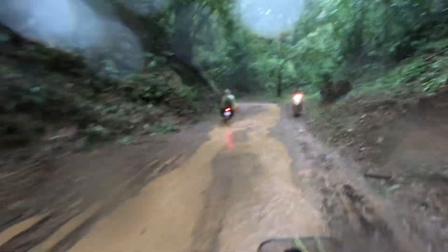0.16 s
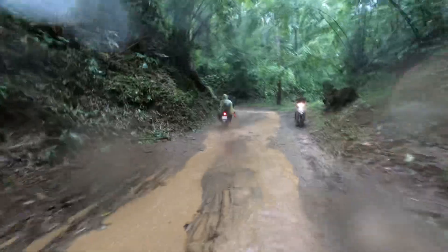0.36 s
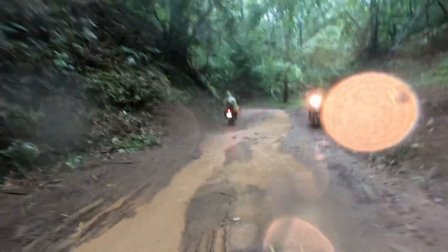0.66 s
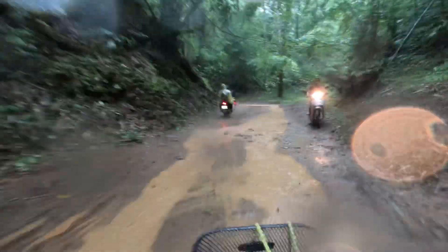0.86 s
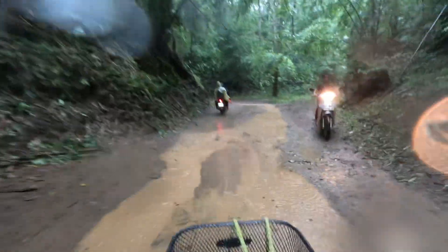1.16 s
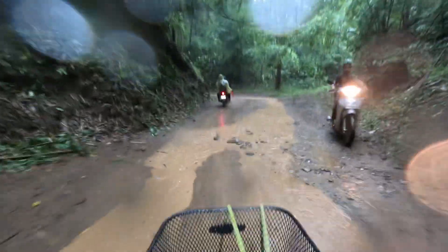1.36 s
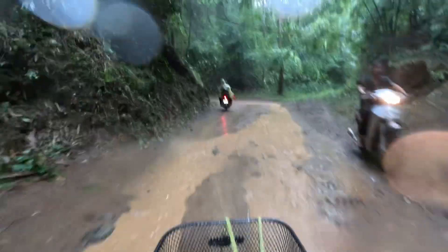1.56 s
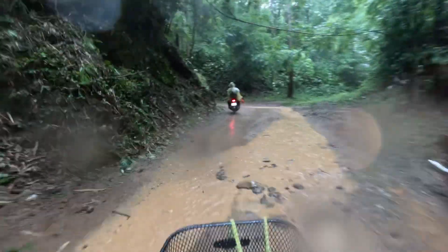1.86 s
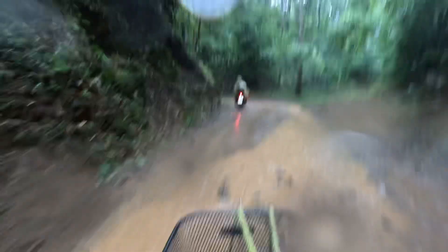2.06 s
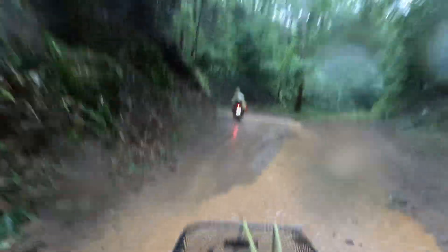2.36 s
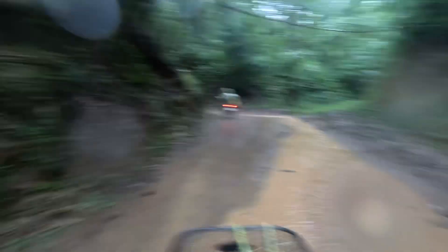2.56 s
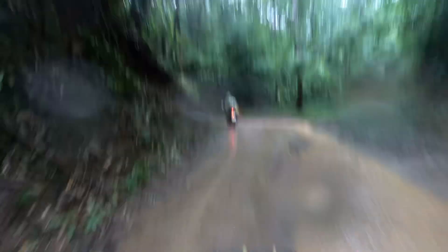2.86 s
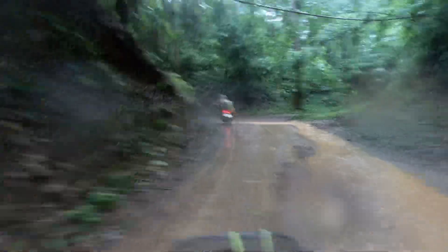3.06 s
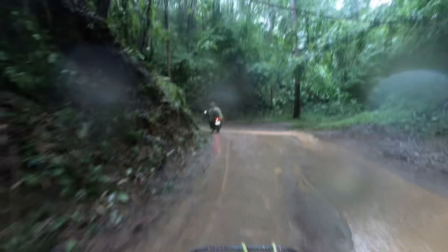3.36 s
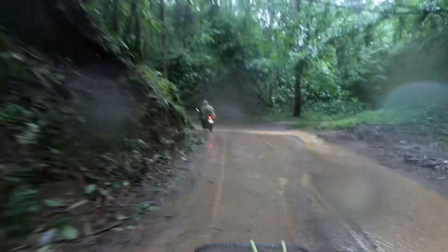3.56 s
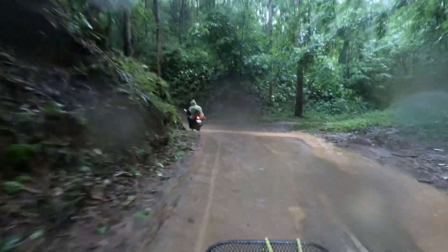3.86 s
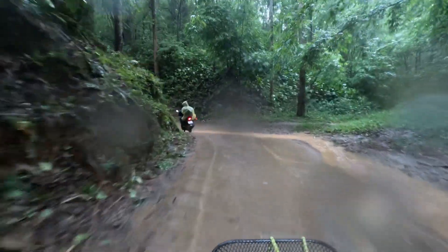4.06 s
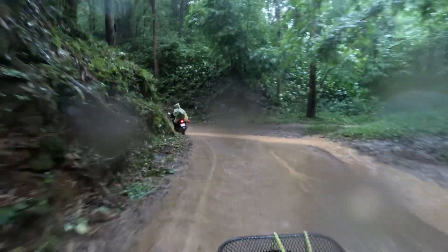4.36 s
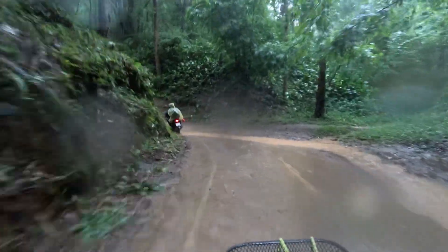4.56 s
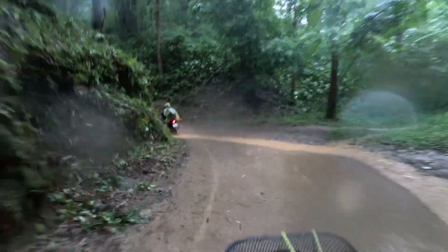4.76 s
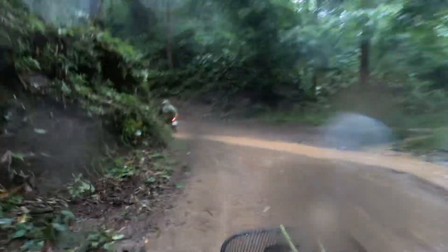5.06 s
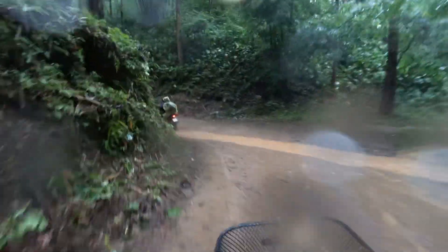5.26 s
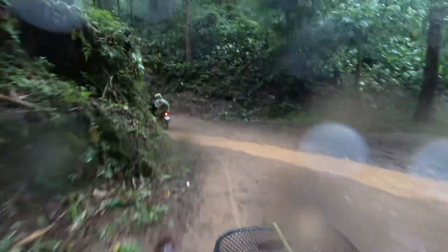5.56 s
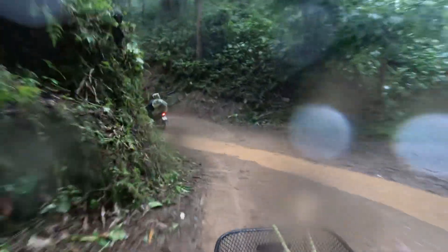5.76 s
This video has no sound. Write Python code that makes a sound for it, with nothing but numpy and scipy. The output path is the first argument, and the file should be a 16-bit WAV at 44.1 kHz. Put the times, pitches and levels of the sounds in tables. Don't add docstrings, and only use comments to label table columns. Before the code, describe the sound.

Outdoors on a muddy forest track in heavy rain, a bike-mounted stereo microphone starts covered by water: low engine throb, muffled roar, small knocks and wet squelches. Popping exhaust from a passing bike follows. Then the ports dry, and bright hiss, spray and low wind buffeting spread wide while drops click harder and more often. A heavy splash, right of centre, dips the level; squeaky wet taps finish.

```python
import sys
import numpy as np
from scipy import signal
from scipy.fft import rfft, irfft, next_fast_len
from scipy.io import wavfile
from scipy.ndimage import uniform_filter1d, map_coordinates

SR = 44100
rng = np.random.default_rng(int(sys.argv[2]) if len(sys.argv) > 2 else 0)


def field_ratio(decibels):
    return 10 ** (np.asarray(decibels, dtype=float) / 20)


def output_pcm(signal):
    pcm = np.clip(np.atleast_2d(signal).T, -1, 1) * 32767
    wavfile.write(sys.argv[1], SR, np.round(pcm).astype(np.int16))


N = 261041
DUCK_S = 5.486


def unit(x):
    return x / np.sqrt(np.mean(x ** 2) + 1e-20)


def along(points, hz):
    f, v = np.transpose(points)
    return np.interp(np.log(hz + 1), np.log(f + 1), v)


def curves(rows):
    s, *cols = np.vstack(rows).T
    return [np.interp(np.arange(N) / SR, s, c) for c in cols]


def wobble(rate):
    knots = rng.standard_normal(int(N * rate / SR) + 4)
    return map_coordinates(knots, [np.arange(N) * rate / SR])


def filtered(x, response):
    m = next_fast_len(N + SR // 2)
    return irfft(rfft(x, m) * response(np.fft.rfftfreq(m, 1 / SR)), m)[..., :N]


def rush(spectrum, patchy_db, spiky_db, channels=2):
    z = signal.stft(rng.standard_normal((channels, N)), nperseg=512)[2]
    field = uniform_filter1d(rng.standard_normal(z.shape[1:]), size=6, axis=0)
    field = uniform_filter1d(field, size=10, axis=1)
    x = signal.istft(z * field_ratio(patchy_db * unit(field)), nperseg=512)[1][:, :N]
    return unit(filtered(x * field_ratio(spiky_db * wobble(250)), lambda hz: field_ratio(along(spectrum, hz))))


def spread(pair, side_db):
    return pair[0] + field_ratio(side_db) * pair[1] * [[1], [-1]]


# centre in Hz, width in Hz, level in dB.
PIPE = [(116, 42, -9), (308, 26, -5), (496, 53, -17.5), (778, 110, -23.5), (968.5, 16, -20)]


def frame(f):
    return sum((-1) ** k * field_ratio(db) * 1j * f * w / (c * c - f * f + 1j * f * w)
               for k, (c, w, db) in enumerate(PIPE))


# time in seconds, firing rate in Hz, shaft shake in dB, load in dB.
ENGINE = [(0.0, 21.6, -42, -30), (0.1, 21.24, -19.5, -31.5), (0.32, 21.23, -25.5, -31),
          (0.64, 21.32, -25, -30), (0.96, 21.51, -25.5, -32.5), (1.55, 21.71, -20.5, -32),
          (1.99, 22.32, -23.5, -27.5), (2.37, 22.12, -32, -28), (2.46, 21.61, -29.5, -27.5),
          (2.58, 21.17, -23.5, -29), (2.8, 21.8, -24.5, -31.5), (3.54, 21.65, -24.5, -34.5),
          (3.94, 22.36, -23, -31.5), (4.23, 22.7, -22.5, -33), (4.71, 20.82, -26.5, -31.5),
          (4.82, 20.9, -30.5, -33.5), (5.14, 21.05, -21, -30.5), (5.46, 20.85, -25, -27.5)]
# multiple of the firing rate, level in dB.
ORDER = [(1, -8.5), (3, -14.5), (4, -4.5), (5, -2), (6, -5.5), (7, -15)]
# time in seconds, strength in dB, lean in dB taken from orders below 5 and given to
EXHAUST = [(0, -28.5, -5.5), (.1, -27, 0.5), (.4, -24, -2.5), (1.4, -28, -2), (1.8, -31, 3),
           (1.99, -27.5, 8.5), (2.17, -25.5, -3.5), (2.36, -22.5, 0.5), (2.48, -23.5, 3), (2.6, -26, -4),
           (2.8, -24.5, 1.5), (3.43, -25.5, 0.5), (4.2, -27.5, 2), (4.8, -26.5, -2.5), (5.26, -38, -0.5),
           (5.44, -29, 1), (5.9, -20, 2.5)]
# centre in seconds, half length in seconds, depth in dB, felt in part by the frame.
EASES = [
    (2.369, 0.2, 2.5),
    (5.247, 0.26, 3),
]
# frequency in Hz, level in dB per Hz.
SEALED = [(15, -13), (28, -9.5), (60, -5), (110, -5.5), (170, -13.5), (320, -16), (410, -23.5), (620, -24),
          (1000, -30.5), (1400, -48), (2300, -48), (3300, -63), (4800, -73.5), (6500, -84.5), (9000, -120)]
# time in seconds, share free of water from 0 to 1.
CLEAR = [
    (2.5, 0.2),
    (3.25, 0.27),
    (3.45, 0.94),
]
EXHAUST_DB, FRAME_DB = -22, 2.5
EASE_FRAME = 0.46


def engine():
    t = np.arange(N) / SR
    hz, shaft_db, load_db = curves(ENGINE)
    exhaust_db, lean_db = curves(EXHAUST)
    exhaust_db = EXHAUST_DB + 0.76 * (exhaust_db - exhaust_db.mean())
    ease_db = sum(db * np.exp(-((t - s) / half) ** 4) for s, half, db in EASES)
    frame_db = load_db + FRAME_DB - EASE_FRAME * ease_db
    turn = np.cumsum(hz) / SR

    shaft = np.cos(4 * np.pi * turn + 0.21 * wobble(6.4))
    shaft = np.sqrt(2) * field_ratio(shaft_db + 0.27 * wobble(21)) * shaft
    orders = np.zeros(N)
    for k, db in ORDER:
        level = field_ratio(db + lean_db * np.clip(k - 5, -1, 1) + 1.8 * wobble(6))
        orders += level * np.cos(2 * np.pi * k * turn + 0.3 * (k - 4) ** 2 + 0.55 * wobble(5))

    def radiated(f):
        return frame(f) * (f / 200) ** 2 / (1 + (f / 200) ** 2)

    firings = np.diff(np.floor(turn + 0.0054 * wobble(19)), prepend=0) * field_ratio(0.41 * wobble(25))
    beat = filtered(firings, lambda f: radiated(f) / (1 + 1j * f / 450) ** 3)
    gate = field_ratio(0.5 * np.cos(2 * np.pi * turn) + 2.0 * wobble(30))
    puffs = filtered(gate * rng.standard_normal(N), lambda f: radiated(f) / (1 + (f / 1200) ** 6))
    roar = rush(SEALED, patchy_db=0.84, spiky_db=1.6, channels=1)[0]
    roar = roar * field_ratio(0.86 * wobble(4.46) + 0.81 * np.cos(4 * np.pi * turn))

    body = field_ratio(frame_db - 10.0) * unit(beat) + field_ratio(frame_db - 4.5) * unit(puffs)
    body += field_ratio(0.61 * frame_db - 6.5) * unit(roar)
    notch = filtered(body, lambda f: 0.89 * np.exp(-((f - 830) / 85) ** 2))
    dry_share = np.clip(curves(CLEAR)[0], 0, 1)
    return shaft + field_ratio(exhaust_db - 0.5) * unit(orders) + body - dry_share * notch


# centre in seconds, half length in seconds, frequency in Hz, width in Hz, level in dB.
SLURPS = [(0.24, 0.033, 2540, 700, -43.5), (0.286, 0.007, 5900, 350, -60), (0.314, 0.013, 6100, 260, -57.5),
          (5.545, .03, 2970, 3240, -40), (2.276, .013, 2550, 330, -46), (2.325, .01, 2350, 280, -54),
          (5.7745, .0016, 3000, 2000, -39), (5.486, 0.0039, 880, 1600, -24), (1.2, 1.5, 7800, 150, -92.5),
          (5.803, 0.012, 920, 205, -30), (2.73, 0.022, 914, 170, -33.5),
          (5.6612, 0.00045, 1300, 1000, -17.5), (5.7222, 0.0009, 1400, 690, -29),
          (0.25, 0.054, 1200, 520, -42), (0.7, 0.57, 5100, 650, -79.5), (1.85, 0.27, 5040, 450, -77.5)]
# centre in seconds, half length in seconds, frequency in Hz, width in Hz, level in dB.
TICKS = [
    (.065, .0018, 1800, 1600, -43),
    (.288, .0012, 2900, 1700, -41),
    (.299, .0012, 5900, 1800, -50),
    (.402, .0014, 2400, 900, -47),
    (2.2635, .0012, 2600, 850, -31),
    (2.2625, .0006, 10000, 1500, -65),
    (2.695, .001, 4200, 1000, -49),
    (2.263, .0013, 5300, 970, -57),
    (2.575, .0015, 2700, 900, -56),
    (2.703, .0018, 2700, 1000, -43),
]
FLICKER_DB = 3


def slurps():
    out, flicker = np.zeros(N), field_ratio(FLICKER_DB * wobble(14))
    for s, half, hz, width_hz, db in SLURPS + TICKS:
        first = max(0, int((s - 4 * half) * SR) - 512)
        last = min(N, int((s + 4 * half) * SR) + 512)
        span = np.arange(first, last)
        white = rng.standard_normal(len(span))
        f = np.fft.rfftfreq(len(span), 1 / SR)
        band = irfft(rfft(white) * np.exp(-((f - hz) / width_hz) ** 4), len(span))
        swell = np.exp(-((span / SR - s) / half) ** 2 / 2)
        if half > 0.2:
            swell = swell * flicker[span]
        out[span] += field_ratio(db) * unit(swell * band) * np.sqrt(np.mean(swell ** 2))
    return out


def rain_patter():
    return 0.3 * wobble(5.8) + 0.93 * wobble(45)


# start in seconds, rise in seconds, end in seconds, fall in seconds.
FIZZ = [
    (.03, 0.28, 1.6, 0.14),
    (2.2, 0.35, 5.478, .012),
]
# frequency in Hz, level in dB per Hz.
TOP = [(10300, -60), (10900, -46.5), (11400, -10), (12200, 3.5), (13200, -8), (14200, 0), (15700, -8),
       (15900, -31.5)]
PORTS_DB = [
    [6],
    [-3],
]
FIZZ_DB, MUFFLED_DB = -68, 17


def fizz(patter):
    t = np.arange(N) / SR
    bare = sum(np.clip(np.minimum((t - s) / rise, 1 - (t - end) / fall), 0, 1)
               for s, rise, end, fall in FIZZ)
    level_db = FIZZ_DB - MUFFLED_DB * (1 - bare) + patter + PORTS_DB
    return field_ratio(level_db) * rush(TOP, patchy_db=0.6, spiky_db=1.2)


# start in seconds, peak in dB.
KNOCKS = [(.061, -23), (.128, -26), (.238, -28.5), (.68, -30), (.876, -25.5), (1.451, -28), (1.627, -27.5),
          (1.784, -25), (1.891, -25.5), (2.069, -29.5), (2.94, -29), (3.0, -27.5), (3.11, -25.5),
          (3.23, -32), (5.694, -36)]
KNOCK_HZ, KNOCK_S = 640, 0.033


def knocks():
    out, t = np.zeros(N + SR), np.arange(SR // 25) / SR
    for (s, db), shift in zip(KNOCKS, rng.normal(0, 0.1, (len(KNOCKS), 2))):
        ring = np.sin(2 * np.pi * KNOCK_HZ * (1 + shift[0]) * t)
        ring += 0.65 * np.sin(2 * np.pi * 1.4 * KNOCK_HZ * (1 + shift[1]) * t)
        out[round(s * SR):][:len(t)] += field_ratio(db - 60 * t / KNOCK_S) * ring
    return filtered(out[:N], lambda f: 1 / (1 + 1j * f / 1500) ** 6)


# start in seconds, peak in dB.
SPECKS = [(0.2387, -58), (0.57, -52.5), (0.885, -52.5), (1.3904, -50), (1.464, -54.5), (1.496, -55),
          (2.2031, -63.5), (2.5606, -50.5), (2.9398, -43.5), (3.021, -52), (4.421, -39.5), (4.9496, -64),
          (5.183, -49.5), (5.36, -44), (5.373, -52.5), (5.481, -42.5)]
SPLAT_S = 0.0012


def specks():
    out, t = np.zeros(N + SR), np.arange(SR // 40) / SR
    for s, db in SPECKS:
        burst = field_ratio(db + 12 - 60 * t / 0.006) * rng.standard_normal(len(t))
        out[round((s + SPLAT_S) * SR):][:len(t)] += burst
    return filtered(out[:N], lambda hz: field_ratio(along(TOP, hz))) * field_ratio([[4], [-5]])


# start in seconds, loudest moment in seconds, end in seconds,
# top frequency in Hz, final top frequency in Hz, level in dB.
SWEEPS = [
    (.28, .29, .42, 4550, 1100, -34),
    (2.682, 2.706, 2.742, 2070, 1520, -32),
]
DRAIN_HOLD = 0.24


def draining():
    hz, t, z = signal.stft(rng.standard_normal(N), SR, nperseg=256)
    hz = hz[:, None]
    gain = np.zeros(z.shape)
    for start, loud, end, top_hz, last_hz, db in SWEEPS:
        held = loud + DRAIN_HOLD * (end - loud)
        edge = np.interp(t, [start, loud, held, end], [0.85 * top_hz, top_hz, top_hz, last_hz],
                         left=min(0.79 * top_hz, 2900))
        swell = np.interp(t, [start, loud, held, end, end + 0.023], [0.11, 0.66, 0.76, 0.34, 0.018])
        gain += field_ratio(db + 13.5) * swell / (1 + (hz / edge) ** 30) / (1 + (hz / 2500) ** 2)
    return signal.istft(z * gain, SR, nperseg=256)[1][:N]


# time in seconds, peak in dB.
POPS = [(1.169, -21.5), (1.498, -21), (1.552, -17), (1.594, -17), (1.645, -22), (1.844, -26), (2.119, -24),
        (2.173, -18), (2.227, -18), (2.283, -15.5), (2.337, -18), (2.39, -14.5), (2.439, -15), (2.487, -17),
        (2.535, -17), (2.582, -19), (2.632, -21), (2.783, -28), (2.939, -21)]


def passing_bike():
    pops, t = np.zeros(N), np.arange(SR // 12) / SR - 0.004
    peak = (1 - (t / 0.0008) ** 2) * np.exp(-(t / 0.0008) ** 2 / 2)
    ring = 0.6 * np.cos(2 * np.pi * 103 * t) * field_ratio(-60 * t / 0.13)
    ring += 0.4 * np.cos(2 * np.pi * 330 * t) * field_ratio(-60 * t / 0.09)
    pop = 0.8 * peak + ring * np.clip(1 + t / 0.002, 0, 1)
    for s, db in POPS:
        pops[round(s * SR):][:len(t)] += field_ratio(db + 3.5) * pop
    return filtered(pops, lambda f: 1 / (1 + (f / 3000) ** 8))


# time in seconds, level in dB.
RAIN = [(2.35, -91.5), (2.45, -91), (2.57, -66), (2.85, -53), (3.06, -50.5), (4.05, -44.5), (4.4, -44),
        (4.7, -42), (5.32, -41.5), (5.46, -39)]
SOAKED_DB, SOAK_S = 5.5, 0.32
FULL_RAIN_DB = -45


def rain_level():
    t = np.arange(N) / SR
    return curves(RAIN)[0] - SOAKED_DB * np.clip((t - DUCK_S) / SOAK_S, 0, 1)


# frequency in Hz, level in dB per Hz.
HISS = [(800, -87), (1500, -52.5), (3000, 2), (5000, -0.5), (6750, -0.5), (7300, -7), (8900, -10.5),
        (10000, -19), (11000, -22), (11500, -57)]
# frequency in Hz, level in dB.
WIDE = [(1500, 6.5), (4300, 1), (4900, -9.5), (7400, -17), (7800, 2), (11000, 9)]
# time in seconds, level in dB.
WIDENS = [
    (2.6, -18.5),
    (3.1, -7),
]
# time in seconds, share from 0 to 1.
SOAKED = [
    (5.48, 0),
    (5.49, 0.7),
]


def rain_hiss(patter):
    trees = rush(HISS, patchy_db=0.2, spiky_db=1.0)
    trees[1] = filtered(trees[1], lambda hz: field_ratio(along(WIDE, hz)))
    hiss = field_ratio(rain_level() + patter) * spread(trees, curves(WIDENS)[0] - 2.0)
    lost_top = filtered(hiss, lambda hz: 1 / (1 + (8800 / (hz + 1)) ** 12))
    return hiss - np.clip(curves(SOAKED)[0], 0, 1) * lost_top


# frequency in Hz, level in dB per Hz.
SPRAY = [(300, -19.5), (600, -13), (840, -9.5), (972, -3), (1350, -4.5), (1700, -3.5), (2800, -9.5),
         (4500, -27), (9000, -57), (11000, -120)]
SPRAY_DB, SPRAY_GROWS = -43.5, 1.1


def tyre_spray(patter):
    opened = np.clip((np.arange(N) / SR - 2.5) / 0.3, 0, 1)
    spray_db = SPRAY_DB + SPRAY_GROWS * (rain_level() - FULL_RAIN_DB)
    noise = spread(rush(SPRAY, patchy_db=1.0, spiky_db=0.2), curves(WIDENS)[0])
    return opened * field_ratio(spray_db + patter) * noise


# centre in seconds, half length in seconds, rise in dB.
GUSTS = [
    (4.035, 0.2, 9),
    (4.99, 0.099, 9.5),
    (5.54, 0.26, 9),
]
WIND_DB, WIND_GROWS = -47.5, 1.5


def port_wind():
    t = np.arange(N) / SR
    wind_db = WIND_DB + WIND_GROWS * (rain_level() - FULL_RAIN_DB)
    wind_db += sum(db * np.exp(-((t - s) / half) ** 2) for s, half, db in GUSTS)
    spectrum = [(15, -8.5), (40, -0.5), (80, -1.0), (250, -4.5), (500, -14.5), (1000, -26.0),
                (3000, -65.5), (6000, -120)]
    gusts = rush(spectrum, patchy_db=3.5, spiky_db=1.8, channels=1)
    return field_ratio(wind_db + 2.2 * wobble(12)) * gusts * [[1], [-1]]


# start in seconds, peak in dB, ring in Hz, left-right balance in dB.
DROPS = [(2.725, -38, 4220, -1.5), (2.8656, -35, 4970, 0), (3.0898, -31, 4000, 2), (3.344, -39, 3450, 0),
         (3.908, -26, 4484, -2), (4.9969, -30, 3940, -1), (2.9399, -28.5, 2740, 1),
         (3.0005, -20.5, 4886, -1), (3.512, -34.5, 3583, 12), (3.5918, -31, 3328, -1),
         (3.706, -24, 3300, -2), (3.883, -26, 3350, 3), (3.8918, -23, 6596, -2), (3.8994, -20.5, 6405, -1),
         (3.946, -16, 3350, 1), (3.967, -25, 3020, 4), (4.011, -20.5, 3280, 1), (4.0906, -26, 4680, 4),
         (4.163, -15.5, 3100, 2), (4.184, -19.5, 7060, -1), (4.4153, -29, 4230, -9),
         (4.422, -27.5, 3176, 11), (4.5544, -29, 2892, -1), (4.632, -23, 4105, -1), (4.849, -22, 4800, 1.5),
         (4.9485, -9.5, 6605, 1.5), (5.0924, -25, 6840, 0), (5.1159, -23, 3115, -3.5),
         (5.3398, -12, 4990, -0.5), (5.375, -15, 5550, 1), (5.387, -40, 7150, -2), (5.4, -25, 4492, 0.5),
         (5.624, -24.5, 2930, 7), (5.631, -20, 3212, 1), (5.6594, -20.5, 4020, -4), (5.7697, -21, 2944, -9)]
# start in seconds, peak in dB, ring in Hz, left-right balance in dB.
BLOBS = [
    (5.1821, -15.5, 2880, 2),
    (5.3235, -24, 3400, 5),
    (5.6361, -28, 3760, -9),
    (5.721, -23.5, 4100, 1.5),
    (5.783, -28, 4420, -1),
]
TAP_DB, THUD_DB = -0.5, 8
CRACK_DB, CRACK_GROWS = -43, 0.44
SMALL_HZ, SMALL_THINS = 3270, 0.42
STRIKE, STRIKE_S = 2.03, 0.00052


def drops():
    out, t = np.zeros((2, N + SR)), np.arange(SR // 40) / SR
    rise = 1 - np.exp(-t / 0.00015)
    for s, db, hz, pan_db, body_db in [(*d, TAP_DB) for d in DROPS] + [(*d, THUD_DB) for d in BLOBS]:
        noise = rng.standard_normal((4, len(t)))
        strike = STRIKE * np.cos(2 * np.pi * hz * t) * field_ratio(-60 * t / STRIKE_S)
        rough = 1 + 4.8 * uniform_filter1d(noise[1][::-1], size=16)
        ring = np.sin(2 * np.pi * hz * t) * rough * field_ratio(-60 * t / 0.012)
        dull = uniform_filter1d(noise[0], size=3) * field_ratio(-60 * t / 0.009)
        body = uniform_filter1d(noise[1], size=14) * field_ratio(body_db + 10.5 - 60 * t / 0.011)
        tap = (0.72 * dull + 0.66 * body) * (SMALL_HZ / hz) ** SMALL_THINS
        crack_db = CRACK_DB + CRACK_GROWS * (db + 23) - db
        crack_db -= 28 * (s > DUCK_S)
        crack = np.diff(noise[2:], prepend=0) * field_ratio(crack_db + 13.0 - 60 * t / 0.0094)
        level = field_ratio(db - 4.5 + np.array([[pan_db], [-pan_db]]))
        drop = strike + rise * (0.44 * ring + tap + crack)
        out[:, round((s + SPLAT_S) * SR):][:, :len(t)] += level * drop
    return filtered(out[:, :N], lambda f: 1 / (1 + (f / 8800) ** 12))


# start in seconds, length in seconds, first frequency in Hz, last frequency in Hz, peak in dB.
BUBBLES = [
    (5.7722, .0054, 2500, 1850, -16),
    (5.7826, .0045, 3100, 4900, -28),
    (5.1832, .0017, 3300, 1300, -17),
]
BUBBLE_OVERTONE, BUBBLE_ROUGH = 0.25, 0.55


def bubbles():
    out = np.zeros(N + SR)
    for s, length, first_hz, last_hz, db in BUBBLES:
        u = np.arange(SR // 20) / SR / length
        hz = first_hz * (last_hz / first_hz) ** np.minimum(u, 1)
        phase = 2 * np.pi * np.cumsum(hz) / SR
        shape = np.clip(u / 0.12, 0, 1) * np.clip((1 - u) / 0.35, 0, 1)
        uneven = 1 + BUBBLE_ROUGH * unit(uniform_filter1d(rng.standard_normal(len(u)), size=12))
        tone = np.sin(phase) + BUBBLE_OVERTONE * np.sin(2 * phase)
        out[round(s * SR):][:len(u)] += field_ratio(db) * shape * uneven * tone
    return filtered(out[:N], lambda f: 1 / (1 + (f / 7500) ** 8))


# start in seconds, first frequency in Hz, peak in dB.
SPLASH = [
    (5.482, 522.5, -7.5),
    (5.659, 784, -19),
]
SPLASH_SAG_S, SPLASH_TURNS = 0.0028, 2.15


def splash():
    out, t = np.zeros((2, N)), np.arange(SR // 50) / SR
    for s, hz, db in SPLASH:
        turns = hz * SPLASH_SAG_S * np.log(1 + t / SPLASH_SAG_S)
        swing = np.sin(np.pi * np.clip(turns / SPLASH_TURNS, 0, 1)) ** 0.55
        thump = -np.sin(2 * np.pi * turns) * swing
        spatter = signal.fftconvolve(rng.standard_normal(len(t)), np.hanning(44) / 11, "same")
        spatter *= field_ratio(-60 * t / 0.03) * np.minimum(t / 0.001, 1) * np.hanning(2 * len(t))[len(t):]
        level = field_ratio(db + np.array([[-7], [2.5]]))
        out[:, round(s * SR):][:, :len(t)] += level * (thump + 1.76 * spatter)
    return out / ducking()


DUCK_DB, RECOVER_DB_PER_S, SETTLE_DB = 19.5, 101, -4


def ducking():
    t = np.arange(N) / SR
    back_db = np.minimum(RECOVER_DB_PER_S * (t - DUCK_S) - DUCK_DB, SETTLE_DB)
    return field_ratio(np.clip((t - DUCK_S) / 0.005, 0, 1) * back_db)


def scene():
    patter = rain_patter()
    ride = engine() + knocks() + passing_bike()
    film = slurps() + draining() + bubbles()
    weather = fizz(patter) + rain_hiss(patter) + tyre_spray(patter) + port_wind()
    return ride + film + weather + specks() + drops() + splash()


def low_pass(x):
    return signal.sosfilt(signal.butter(12, 15840, fs=SR, output="sos"), x)


def record(dry):
    fade_in = np.minimum(0.5 + np.arange(N) / (0.0087 * SR), 1)
    mix = filtered(dry * ducking() * fade_in, lambda hz: hz < 15830)
    return low_pass(mix)


dry = scene()
out = record(dry)
output_pcm(out)
```